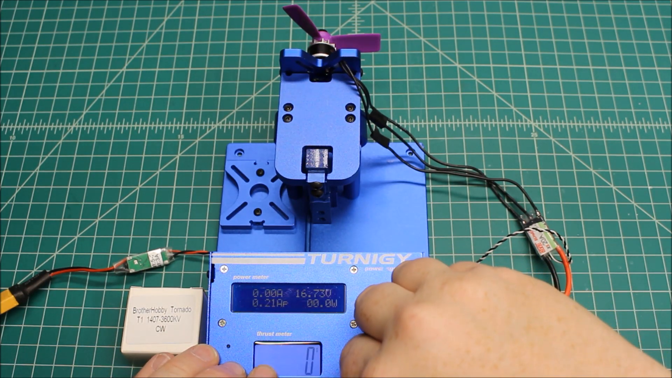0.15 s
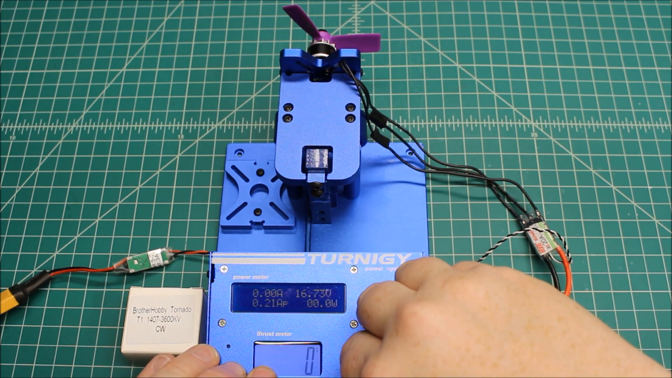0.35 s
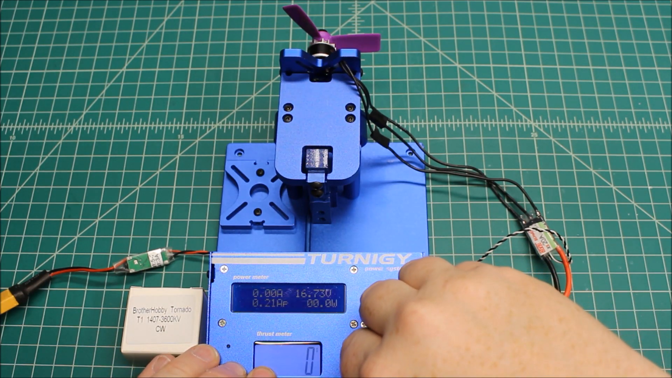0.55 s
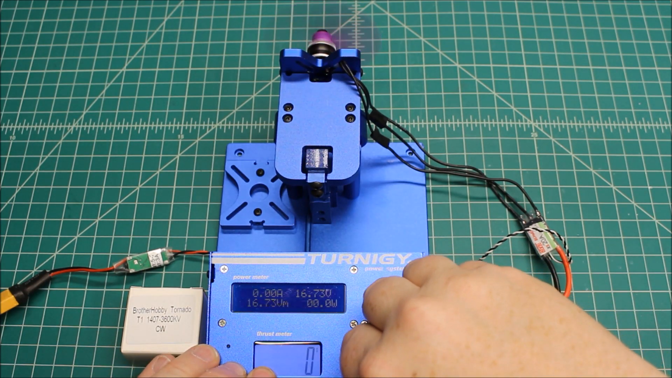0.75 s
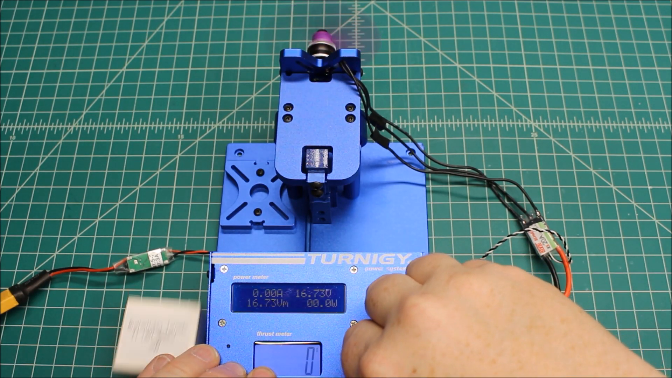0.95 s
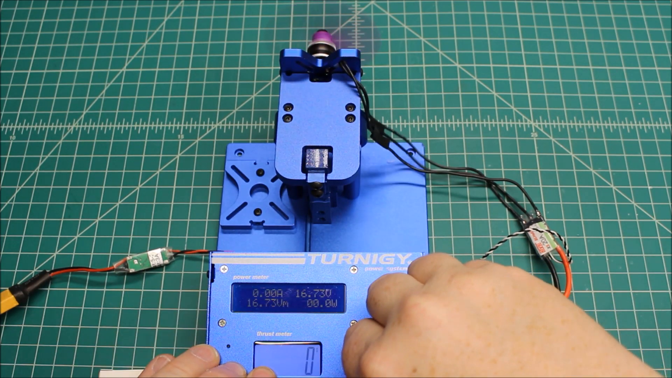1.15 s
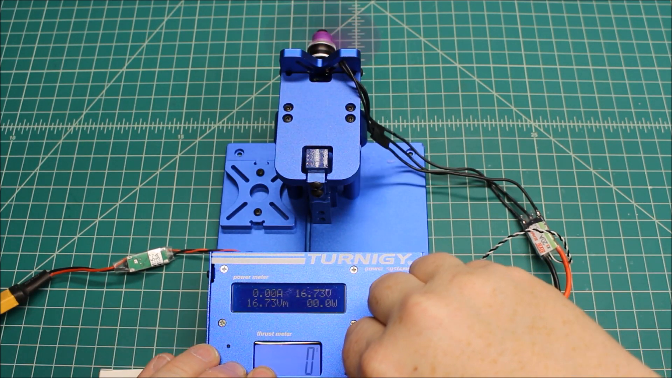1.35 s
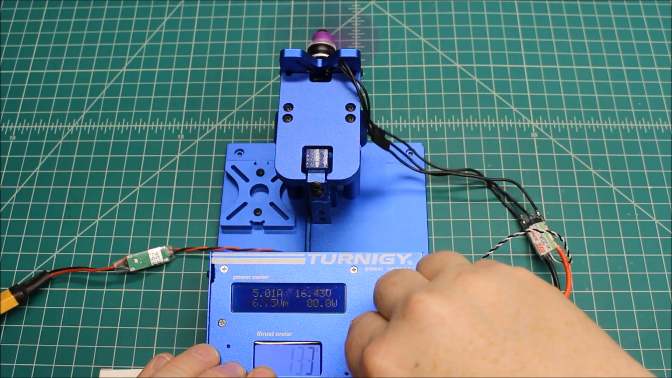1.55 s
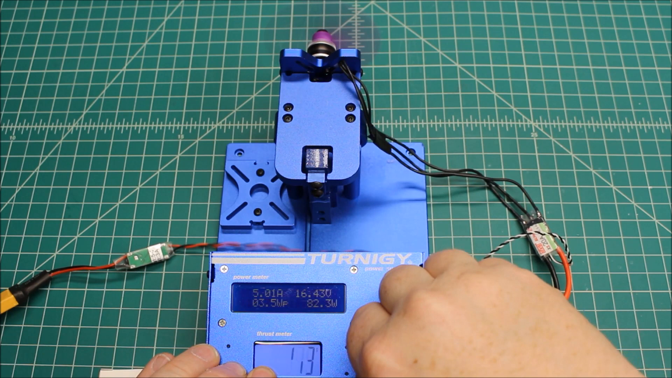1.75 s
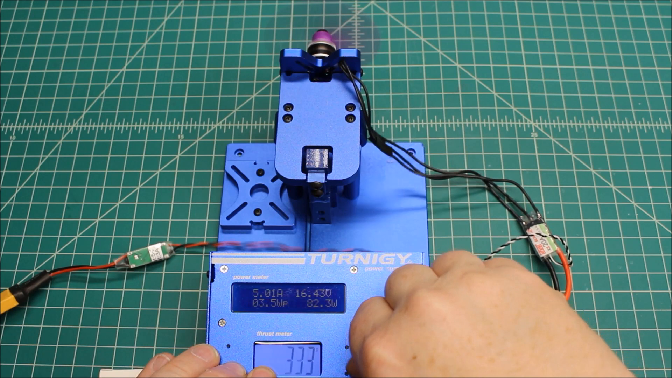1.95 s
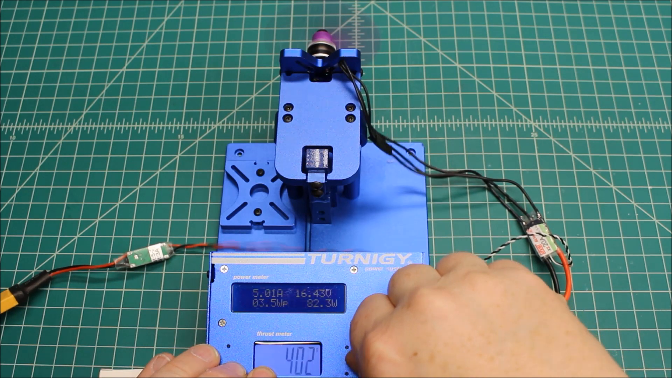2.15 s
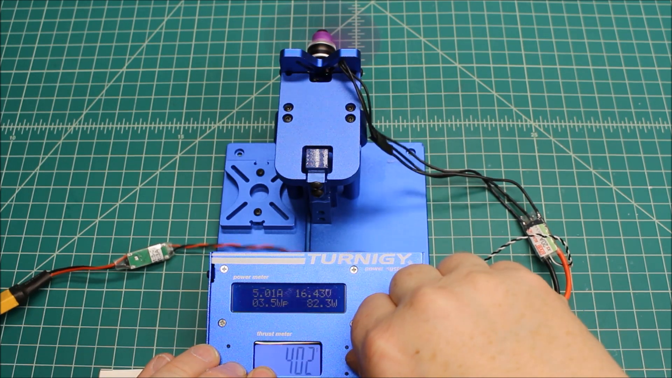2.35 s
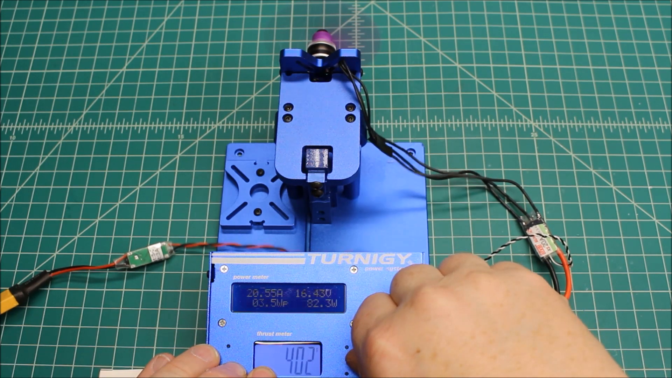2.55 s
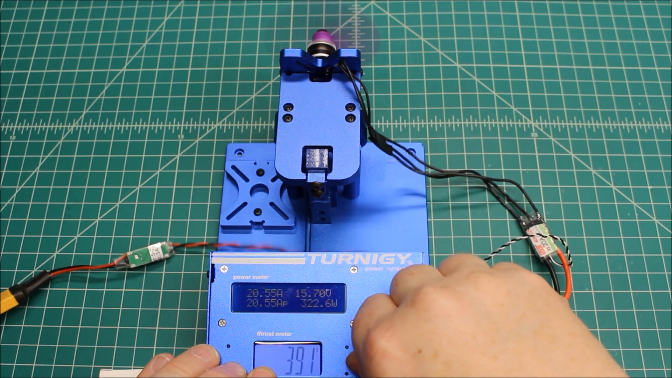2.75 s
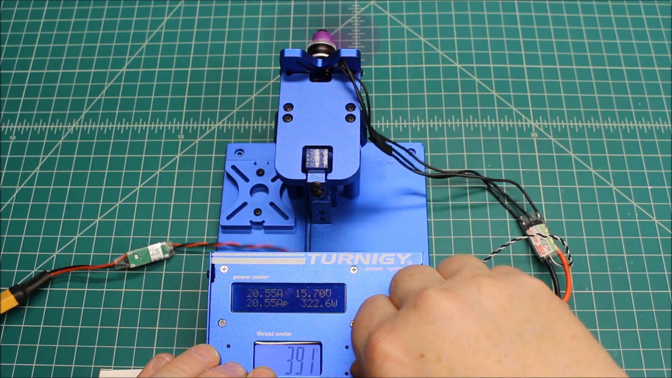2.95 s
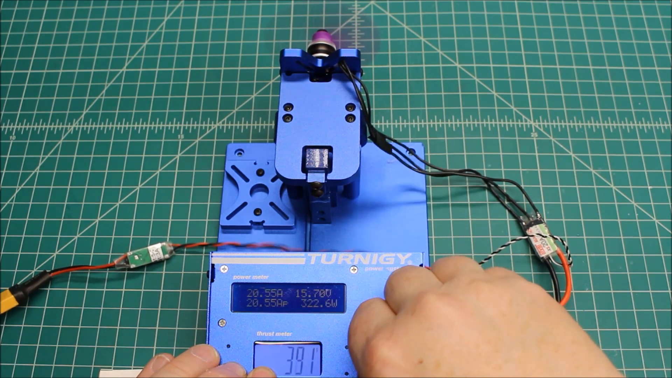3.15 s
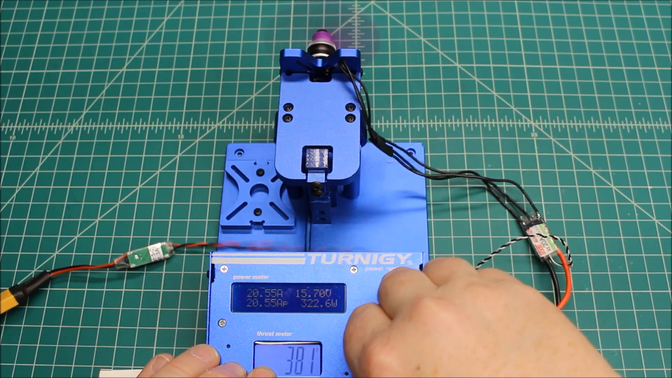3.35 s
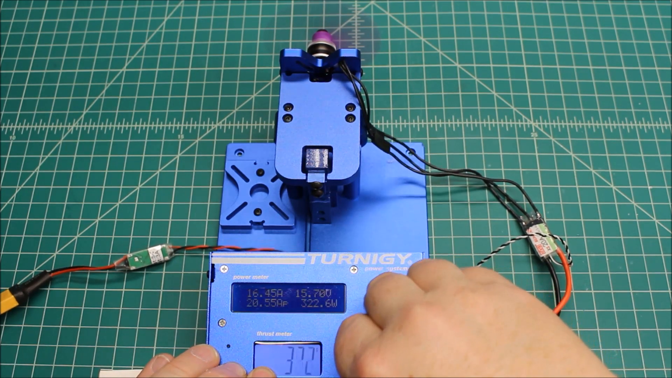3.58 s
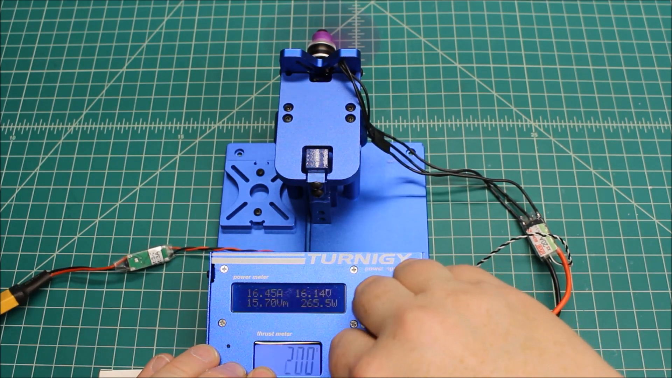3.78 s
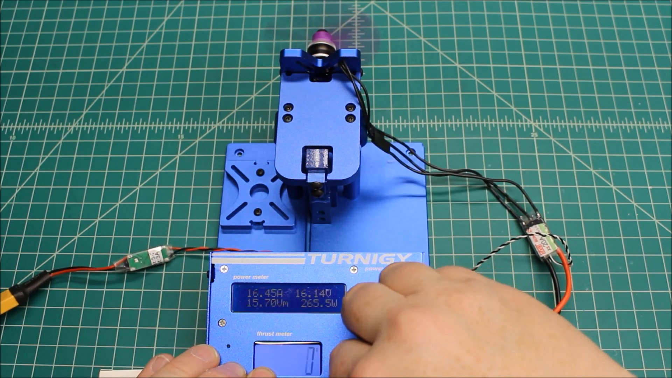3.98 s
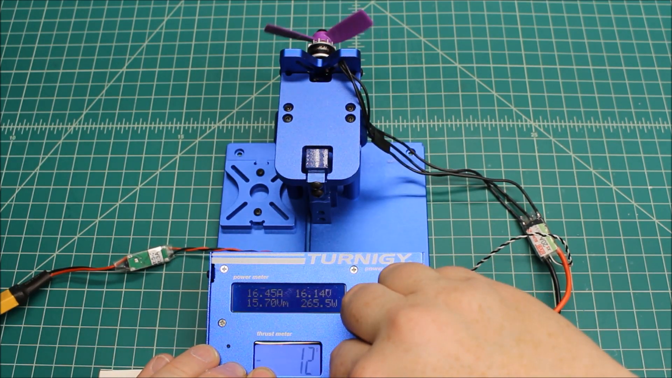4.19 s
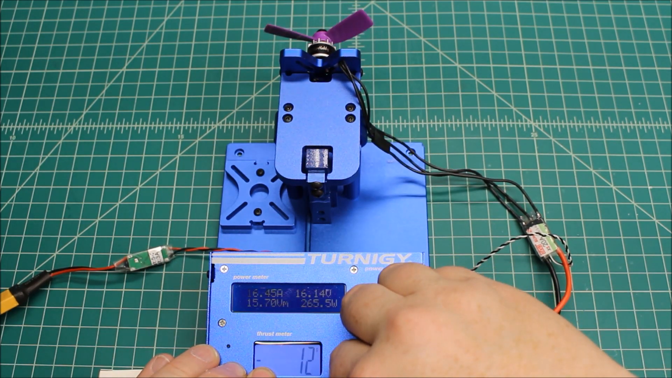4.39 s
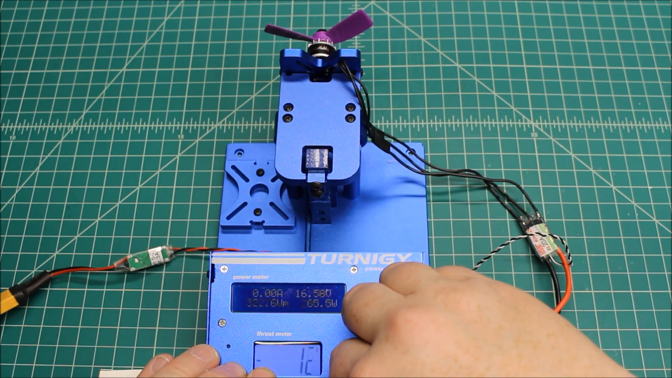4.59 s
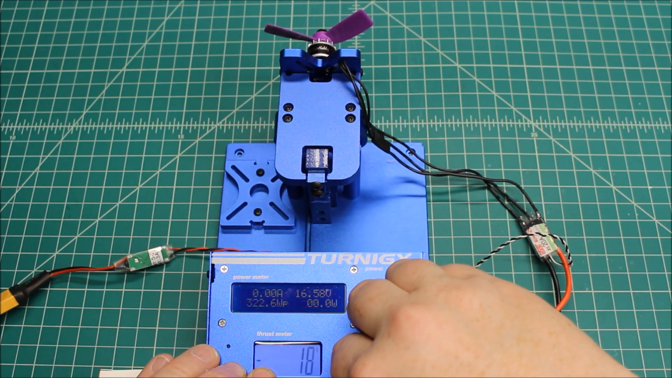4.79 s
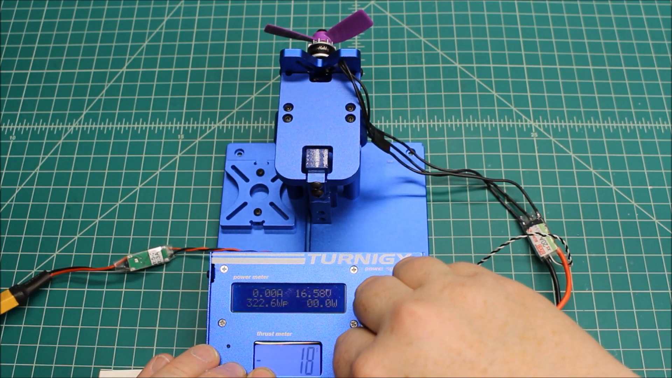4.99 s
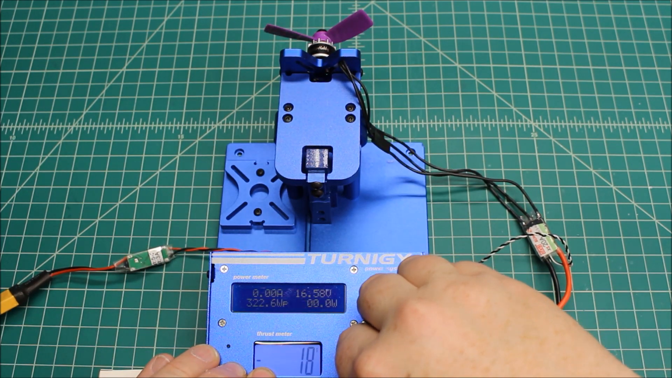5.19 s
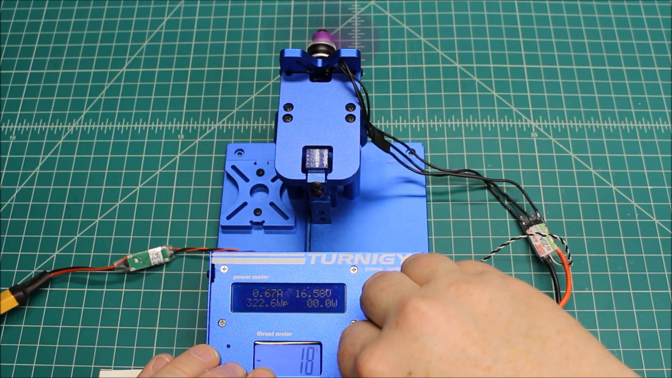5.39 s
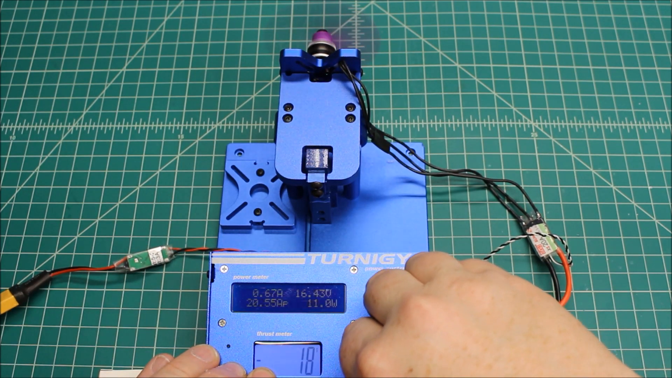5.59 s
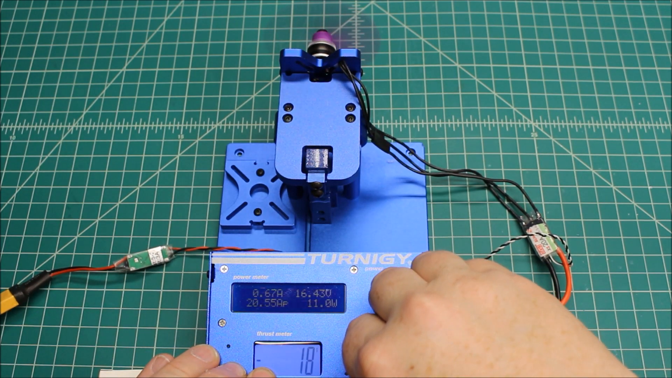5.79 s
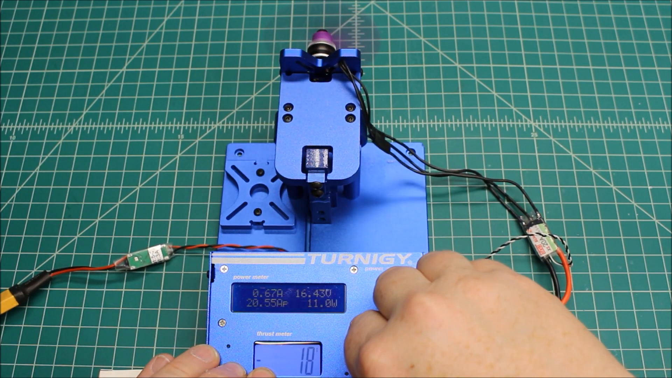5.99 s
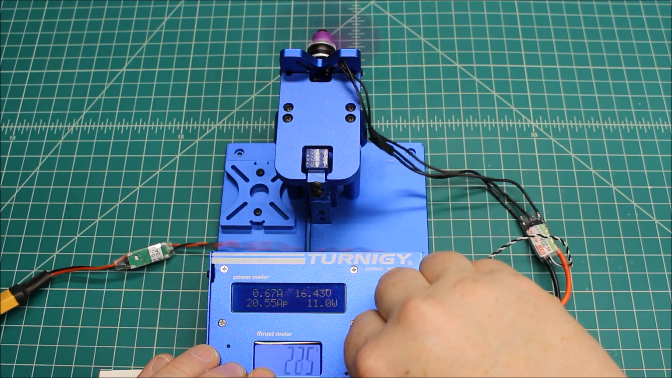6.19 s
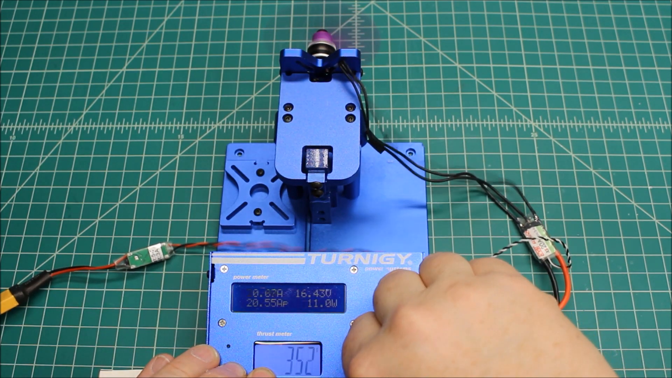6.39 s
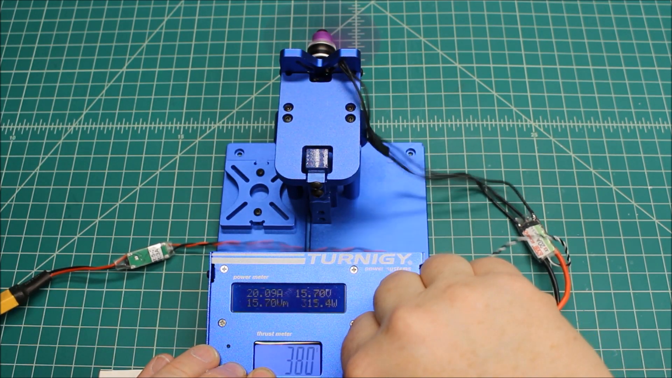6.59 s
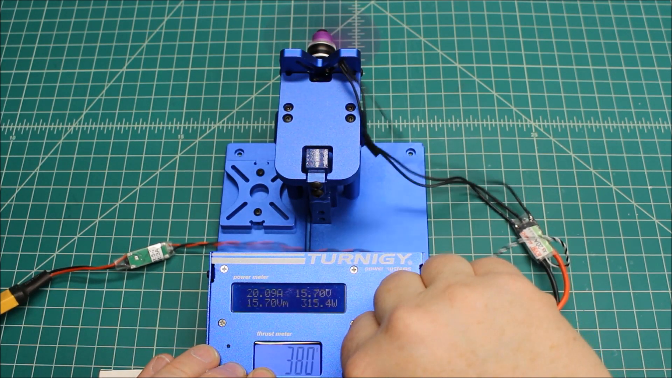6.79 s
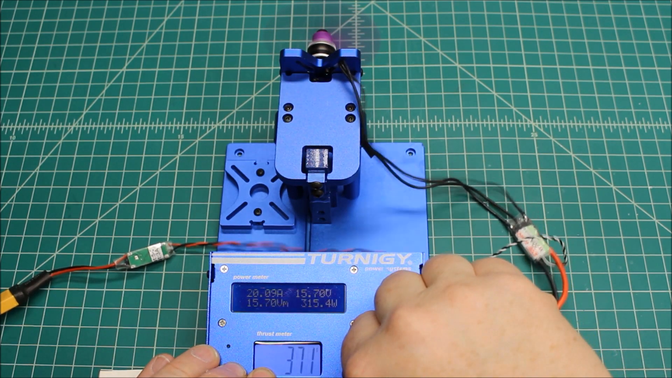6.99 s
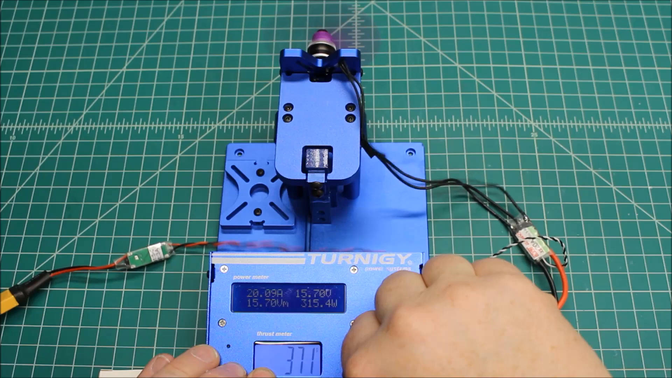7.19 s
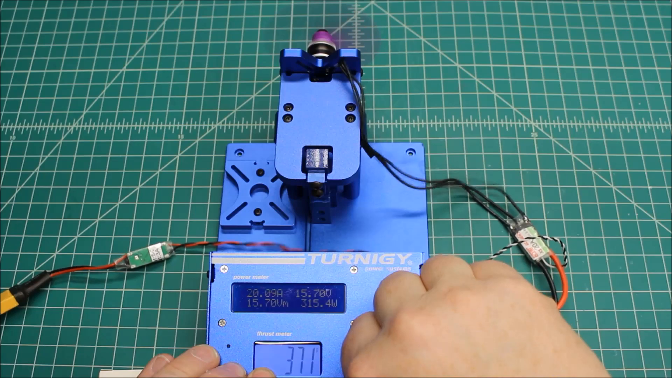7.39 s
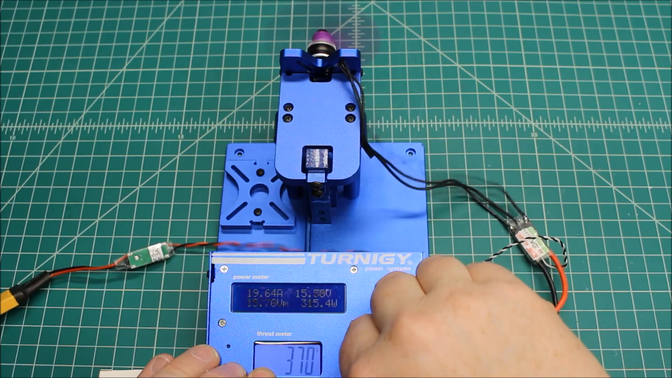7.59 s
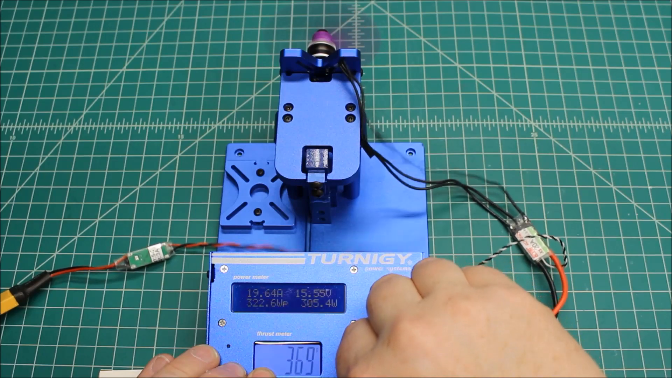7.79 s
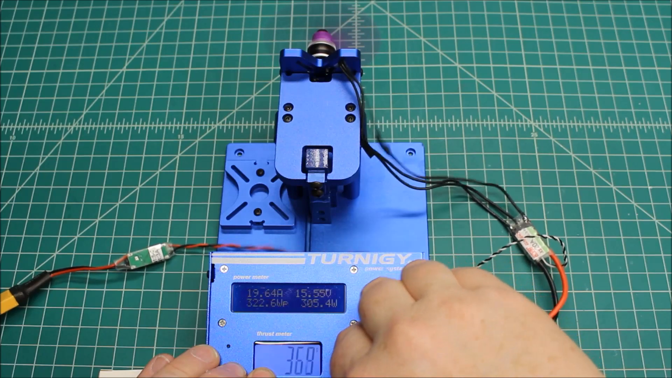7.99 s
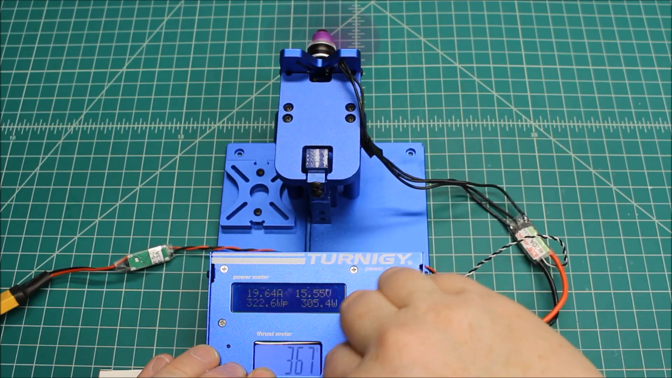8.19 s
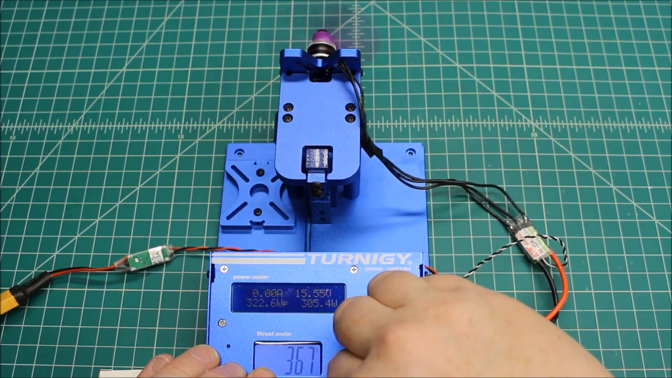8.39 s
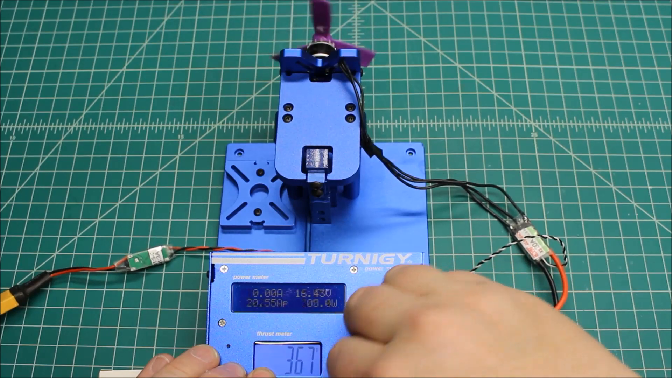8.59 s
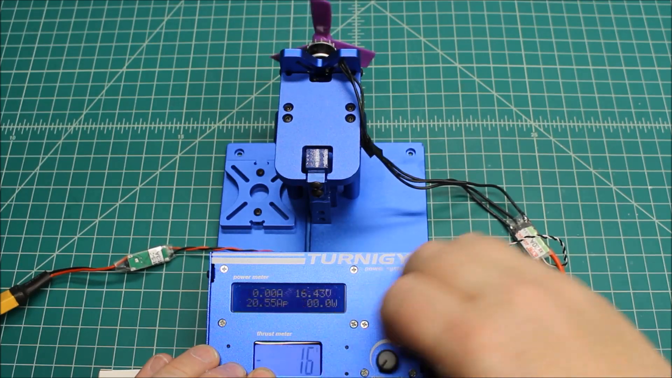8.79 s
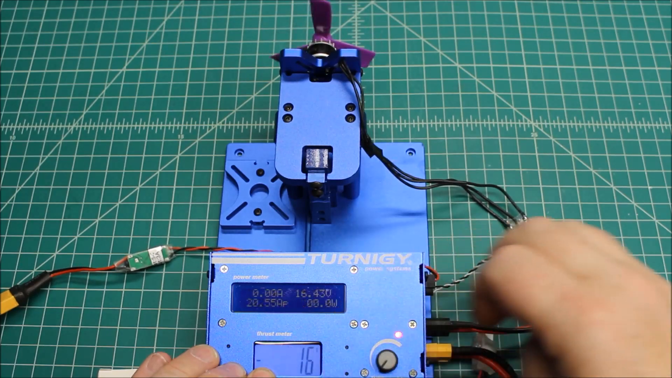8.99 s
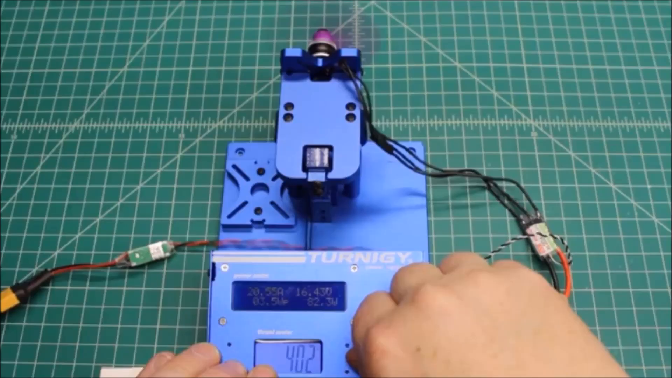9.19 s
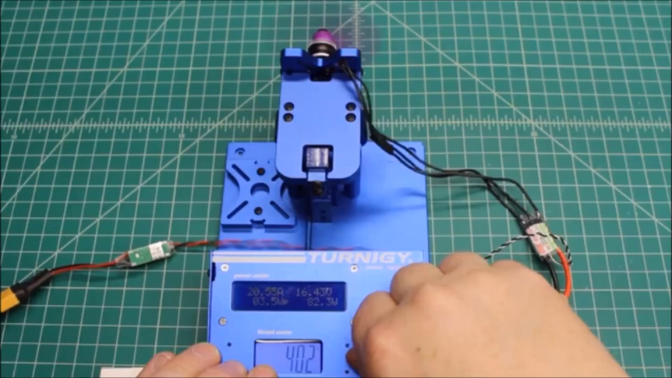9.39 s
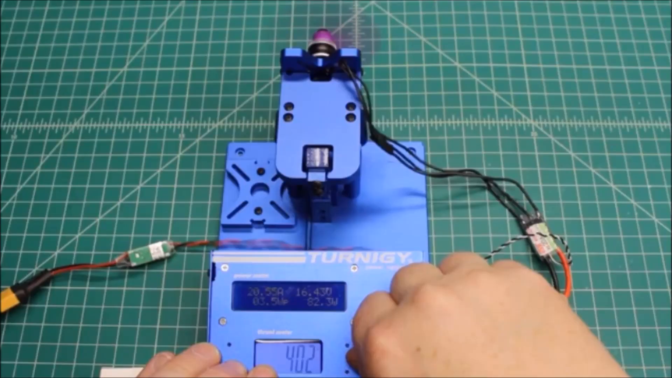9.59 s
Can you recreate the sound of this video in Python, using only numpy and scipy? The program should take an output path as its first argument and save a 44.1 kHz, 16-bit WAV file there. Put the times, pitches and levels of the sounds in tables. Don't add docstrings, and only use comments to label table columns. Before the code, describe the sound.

Twice, a little brushless motor and three-blade propeller climb from rough buzz to shrill droning whine, sag slightly, then wind down quickly in a quiet room.

```python
import sys
import numpy as np
from scipy import signal
from scipy.fft import rfft, irfft, next_fast_len
from scipy.io import wavfile
from scipy.ndimage import uniform_filter1d

SR = 44100
rng = np.random.default_rng(int(sys.argv[2]) if len(sys.argv) > 2 else 0)


def put_to_file(sound):
    columns = np.atleast_2d(sound).T
    safe = np.clip(columns, -1, 1)
    whole_steps = np.round(safe * 32767)
    wavfile.write(sys.argv[1], SR, whole_steps.astype(np.int16))


def makeup_ratio(level_db):
    decades = np.asarray(level_db, float) / 20
    return 10 ** decades


N = 425565

# time in seconds, shaft speed in turns per second (Hz).
SPIN_UPS = [
    [(.765, 21), (.83, 85.47), (.9, 172), (.97, 235.8), (1.06, 303.4), (1.16, 356), (1.46, 422.6),
     (1.61, 498)],
    [(5.33, 15), (5.36, 40), (5.42, 164), (5.5, 244), (5.56, 283), (5.69, 350), (5.84, 454)],
]
# time in seconds, shaft Hz, loss in Hz that the
HOLDS = [
    (1.8, 677.9, 48),
    (6.222, 663.1, 35.7),
]
# time in seconds, shaft Hz; after the last row the rotor coasts.
WIND_DOWNS = [
    [(3.41, 659.7), (3.48, 607.3), (3.56, 533.6), (3.64, 434.6), (3.74, 277), (3.8, 200.5), (3.86, 108.3),
     (3.885, 91.3)],
    [(7.975, 658.5), (8.07, 570.3), (8.13, 500), (8.17, 409), (8.25, 187), (8.3, 99.8), (8.315, 89.7)],
]
# time in seconds, peak in dB.
KICKS = [
    (0.7551, -44),
    (5.2894, -57),
    (5.3306, -32.5),
]
# time in seconds, level in dB.
COIL_BUZZ = [
    [(.775, -52), (.9, -35), (1.0, -46)],
    [(5.33, -47), (5.45, -30.5), (5.55, -46)],
]
# time in seconds, level in dB.
ARM_RINGS = [
    (0.753, -60),
    (4.075, -50.5),
    (5.295, -58),
    (5.35, -56.5),
    (8.508, -49.5),
]

# multiple of the shaft rate, level in dB.
SHAFT_ORDERS = [(1, 2.5), (2, -21), (4, -2.5), (5, -15.5), (7, -27.5), (10, -14.5), (11, -7.5)]
# multiple of the shaft rate, level in dB, steady share from 0 to 1.
OVERTONES = [(9.002, -7, 0.3), (11.95, -8.5, 0.4), (14.95, -8, 0), (18, -7, 0), (21, -7.5, 0.13),
             (25.1, -7.5, .1), (26.6, -17.5, .1)]
# multiple of the shaft rate, level in dB.
COGGING_ORDERS = [(36, 0), (12, -7)]
# multiple of the shaft rate, level in dB.
NOTCH_ORDERS = [(62, 0), (96, -8)]
# Hz, level in dB.
WHINE_LEVEL = [(500, -61), (1000, -71.5), (1700, -57.5), (3300, -54), (6500, -48), (8000, -54.5),
               (9800, -42.5), (11500, -49)]
# Hz, change in dB.
WHINE_UNPOWERED = [(700, 6), (3000, 3.5), (4500, 0), (11000, 4)]

# Hz, gain in dB.
RADIATION = [(1500, -10), (3000, -6), (4500, -3), (5800, 1.5), (6050, -0.5), (7300, 7), (7750, 4.5),
             (8050, 4), (9000, 1.5), (11000, -1), (13000, -9.5), (16000, -11.5)]
# Hz, width in Hz, gain in dB.
STAND_MODES = [(966, 60, -5.5), (1740, 40, -5), (2180, 11, -3), (2330, 25, -8.5), (2596, 54, -1.5),
               (3187, 27, -1.5), (3473, 20, -5.5), (4480, 14, 1), (6660, 74, -4.5), (6920, 75, 0.5),
               (7480, 120, 1), (9720, 76, 4), (10310, 120, 0)]
# Hz, width in Hz, gain in dB.
STANDING_WAVES = [(677, 5.9, 3.5), (2026, 3.3, 0.5), (2020, 3.4, -9.5), (1970, 4, 6), (1960, 8, 2),
                  (1970, 4, -5), (1956, 5, -7), (1944, 7, 5.5), (4052, 24, 8), (3947, 7.9, 6.5),
                  (3970, 12, -2.5), (3890, 14, -9)]
# Hz, dB per Hz.
WHOOSH_COLOUR = [(100, -3), (470, -4), (640, 5), (1000, 4.5), (1700, 2), (3300, -2), (5500, -1),
                 (7200, 0.5), (9000, -5.5), (11000, -3.5), (12600, -0.5), (14600, -9), (15700, -8.5)]
# Hz, dB per Hz.
WASH_COLOUR = [(15, -2), (35, -1.9), (70, -5.5), (140, -16.5), (300, -17.5), (600, -39.5)]
# Hz, level in dB rms.
HUM = [(161.5, -73.5), (204.6, -83), (242.2, -74.5), (285.3, -80.5), (323.0, -81)]
# Hz, dB per Hz.
HISS_COLOUR = [(12, -38), (20, -13), (107, -9.5), (167, -4), (247, -8.5), (336, -11), (376, -13.5),
               (540, -15.5), (694, -19), (944, -17), (1440, -20.5), (13800, -21.5), (15900, -25.5)]
# Hz, gain in dB.
BAND_EDGE = [(15740, 0), (15810, -90)]

# dB at full speed, dB lost per halving of speed,
# dB per 1000 turns/s2 while speeding up, the same while slowing down.
BLADE_LAW = (-18, 28, -2, -1.5)
OCTAVE_LAW = (-31, 24.5, -4, -1)
UNBALANCE_LAW = (-32.5, 19, -5.5, -2)
OVERTONE_LAW = (-19, 11.5, -6, 0)
WHOOSH_LAW = (-32, 18, -0.5, 1)
WASH_LAW = (-38.5, 13.5, 1.5, -2.5)
TILT_LAW = (2, -0.9, -0.7, -0.2)

FULL_SPEED_HZ, STOP_HZ = 650, 11


def rms_one(x):
    return x / np.sqrt(np.mean(np.abs(x) ** 2) + 1e-20)


def in_time(tables):
    s, *columns = np.transpose(sorted(list(row) for rows in tables for row in rows))
    return [np.interp(np.arange(N) / SR, s, c) for c in columns]


def while_turning(tables, fade=.03):
    t = np.arange(N) / SR
    gate = np.zeros(N)
    for rows in tables:
        first, last = rows[0][0], rows[-1][0]
        gate += np.interp(t, [first - fade, first, last, last + fade], [0, 1, 1, 0])
    return gate


def at_hz(points, hz):
    points = np.array(points)
    return np.interp(np.log(hz + 1), np.log(points[:, 0]), points[:, 1])


def colour(x, spectrum):
    size = next_fast_len(N)
    hz = np.arange(size // 2 + 1) * SR / size
    return irfft(rfft(x, size) * makeup_ratio(at_hz(spectrum, hz)), size)[..., :N]


def stretch(slow):
    return np.interp(np.arange(N) / 8, np.arange(len(slow)), rms_one(slow))


def drift(rate):
    r = np.exp(-16 * np.pi * rate / SR)
    noise = rng.standard_normal(N // 8 + 4002)
    return stretch(signal.lfilter([1], [1, -2 * r, r * r], noise)[4000:])


def eddy_noise(width_hz, skirt_db):
    white = rng.standard_normal((2, N // 8 + 2)) + 1j * rng.standard_normal((2, N // 8 + 2))
    core, skirt = np.exp(-16 * np.pi * width_hz * np.array([1, 5]) / SR)
    slow = rms_one(signal.lfilter([1], [1, -2 * core, core ** 2], white[0]))
    slow += makeup_ratio(skirt_db) * rms_one(signal.lfilter([1], [1, -2 * skirt, skirt ** 2], white[1]))
    return stretch(slow)


def shaft_speed():
    droop_s, coast_s = 2.5, .105
    inertia_s, easing_s = .02, .08
    t, out = np.arange(N) / SR, np.zeros(N)
    for up, (full_s, full_hz, loss), down in zip(SPIN_UPS, HOLDS, WIND_DOWNS):
        held = np.interp(t, *np.transpose(up + [(full_s, full_hz)]))
        held -= loss * (1 - np.exp(-np.maximum(t - full_s, 0) / droop_s))
        eased = np.interp(t, *np.transpose(down), left=np.inf)
        eased = eased * np.exp(-np.maximum(t - down[-1][0], 0) / coast_s)
        course = np.minimum(held, eased)
        quick = uniform_filter1d(course, size=int(inertia_s * SR))
        gentle = uniform_filter1d(course, size=int(easing_s * SR))
        speed = quick + (gentle - quick) * np.clip(quick / 100 - 4.5, 0, 1)
        out += speed * (t > up[0][0]) * (speed > STOP_HZ)
    return out


def follow(law, speed):
    full_db, halving_db, rising_db, falling_db = law
    push = uniform_filter1d(np.gradient(speed), size=4000) * SR / 1000
    push_db = np.where(push > 0, rising_db, -falling_db) * push
    return full_db + halving_db * np.log2((speed + 5) / FULL_SPEED_HZ) + push_db


def standing_db(hz):
    grid = np.arange(5000)
    gain = sum(db * np.exp(-((grid - at) / width) ** 2) for at, width, db in STANDING_WAVES)
    return np.interp(hz, grid, gain)


def background():
    t = np.arange(N) / SR
    mid, side = colour(rng.standard_normal((2, N)), HISS_COLOUR)
    out = makeup_ratio(-62.5 - 3.5) * rms_one(mid + makeup_ratio(-3) * side * [[1], [-1]])
    out += makeup_ratio(-79.0) * rms_one(colour(rng.standard_normal(N), WASH_COLOUR))
    for hz, db in HUM:
        out += makeup_ratio(db + 1.5 + 3 * drift(5)) * np.sin(2 * np.pi * hz * t)
    return out


def room(x, t60=.3):
    t = np.arange(SR // 2) / SR
    tail = rng.standard_normal(len(t)) * makeup_ratio(-60 * t / t60) * (t > .004)
    return signal.fftconvolve(x, tail / np.sqrt(np.sum(tail ** 2)))[:N]


def arm():
    ring_hz, t60_s, swell_s = 515.5, 0.36, 0.0076
    t = np.arange(N) / SR
    out = np.zeros(N)
    for s, db in ARM_RINGS:
        age = np.maximum(t - s, 0)
        envelope = makeup_ratio(db - 60 * age / t60_s) * (1 - np.exp(-age / swell_s))
        out += envelope * np.sin(2 * np.pi * ring_hz * age)
    return out


def wash(speed):
    lag_s = .09
    level_db = follow(WASH_LAW, np.roll(speed, int(lag_s * SR)))
    lumps = drift(8)
    return makeup_ratio(level_db + 1.8 * lumps) * rms_one(colour(rng.standard_normal(N), WASH_COLOUR))


def whoosh(speed):
    level_db, tilt_db = follow(WHOOSH_LAW, speed), follow(TILT_LAW, speed)
    air = rms_one(colour(rng.standard_normal(N), WHOOSH_COLOUR))
    low = signal.lfilter([.3], [1, -.7], air)
    high = air - low
    return makeup_ratio(level_db + 6 + 0.48 * drift(36)) * (makeup_ratio(-tilt_db) * low + makeup_ratio(tilt_db) * high)


def ring_stand(force):
    out = np.zeros(N)
    for k, (hz, width, db) in enumerate(STAND_MODES):
        r = np.exp(-np.pi * width / SR)
        b = [(1 - r * r) / 2, 0, -(1 - r * r) / 2]
        a = [1, -2 * r * np.cos(2 * np.pi * hz / SR), r * r]
        out += (-1) ** k * makeup_ratio(db) * signal.lfilter(b, a, force + 1e-18)
    return out


def magnet_pull(speed, turn):
    lost_hz, unpowered_low_db = 321, -6
    slowing = np.gradient(speed) < 0
    audible = np.clip((speed - STOP_HZ) / 4, 0, 1) * np.clip((lost_hz - speed) / 15, 0, 1)
    whine_hz = COGGING_ORDERS[0][0] * speed
    whine_db = at_hz(WHINE_LEVEL, whine_hz) + at_hz(WHINE_UNPOWERED, whine_hz) * slowing
    strength = makeup_ratio(whine_db + 2.3 * drift(59)) * audible
    pull = np.zeros(N)
    for k, db in COGGING_ORDERS:
        order_db = db - 2 + unpowered_low_db * slowing * (k < 20) + 3 * drift(30)
        pull += makeup_ratio(order_db) * np.sin(k * turn + .8 * drift(150))
    return strength * pull


def crawl_notches(speed, turn):
    crawl = np.exp(-((speed - 74) / 8) ** 2) * np.where(np.gradient(speed) < 0, 1.8, .7)
    snaps = sum(makeup_ratio(db) * np.sin(k * turn + .6 * drift(150)) for k, db in NOTCH_ORDERS)
    return makeup_ratio(-52.5) * crawl * snaps


def motor(speed, turn):
    pull = magnet_pull(speed, turn)
    notches = crawl_notches(speed, turn)
    kicks = np.zeros(N)
    kicks[[round(s * SR) for s, db in KICKS]] = makeup_ratio(np.array(KICKS)[:, 1] + 18)
    bearings = makeup_ratio(-21.5 + 3.6 * drift(22)) * (speed / 600) ** 2.3
    coils = makeup_ratio(in_time(COIL_BUZZ)[0] + 2.2 * drift(50)) * while_turning(COIL_BUZZ, fade=.012)
    noise = rng.standard_normal(N)
    coil_buzz = coils * np.gradient(noise)
    shaking = makeup_ratio(14.0) * pull + makeup_ratio(3) * notches + kicks + bearings * noise + coil_buzz
    airborne = colour(pull, [(500, -5), (2500, 0.0), (12000, 8.0)])
    return airborne + makeup_ratio(-18.5) * coil_buzz + makeup_ratio(-2.5) * notches + ring_stand(shaking)


def propeller(speed, turn):
    blade_knee_hz, level_knee_hz, below_knee_db = 260, 306, 29
    level_db = follow(OVERTONE_LAW, speed)
    level_db = level_db + below_knee_db * np.minimum(np.log2((speed + 5) / level_knee_hz), 0)
    out = np.zeros(N)
    ripple_db = 1.8 * rng.standard_normal(160)
    for k, db, steady in OVERTONES:
        hz = k * speed
        share = np.clip(steady * (speed / 670) ** 0.5, 0, 1)
        tone = np.sqrt(share) + np.sqrt(1 - share) * eddy_noise(3.5 * k, skirt_db=-8)
        heard = hz < .4 * SR
        bench_db = np.interp(hz / 140, np.arange(160), ripple_db)
        sharpness = np.clip(speed / FULL_SPEED_HZ, 0, 1) ** (0.074 * k)
        gain = heard * sharpness * makeup_ratio(db + 2.5 + bench_db + at_hz(RADIATION, hz))
        out -= gain * np.real(tone * np.exp(1j * k * turn))
    eddies_db = 2.0 * drift(7.3)
    return np.clip(speed / blade_knee_hz, 0, 1) ** 2 * makeup_ratio(level_db + eddies_db) * out


def clean_tones(speed, turn):
    blade_db = follow(BLADE_LAW, speed) + standing_db(3 * speed)
    octave_db = follow(OCTAVE_LAW, speed) + standing_db(6 * speed)
    shaft_db = follow(UNBALANCE_LAW, speed) + standing_db(speed)
    out = -makeup_ratio(blade_db + 2 + 0.74 * drift(29)) * np.cos(3 * turn + 0.027 * drift(45))
    out -= makeup_ratio(octave_db + 3.0 + 2.1 * drift(38)) * np.cos(6 * turn + 0.15 * drift(40))
    for k, db in SHAFT_ORDERS:
        out += makeup_ratio(shaft_db + db + 1.6 * drift(29)) * np.sin(k * turn + rng.uniform(0, 2 * np.pi))
    return out


def scene():
    speed = shaft_speed()
    turn = 2 * np.pi * np.cumsum(speed) / SR
    running = uniform_filter1d(1. * (speed > 0), size=1300)
    tones = clean_tones(speed, turn)
    rig = propeller(speed, turn) + motor(speed, turn) + running * whoosh(speed)
    gliding = np.clip(np.abs(uniform_filter1d(np.gradient(speed), size=4000)) * SR / 350, .12, 1)
    echo = room(makeup_ratio(-3.0) * gliding * tones + makeup_ratio(-8.0) * rig)
    return tones + rig + arm() + echo + wash(speed) + background()


def band_limit(x):
    return signal.sosfilt(signal.butter(12, 16010, fs=SR, output="sos"), x)


def record(dry):
    end_s = 9.18
    x = np.tanh(dry / 1.273) * 1.388 * (np.arange(N) < end_s * SR)
    x = colour(x, BAND_EDGE)
    return band_limit(x)


dry = scene()
out = record(dry)
put_to_file(out)
```